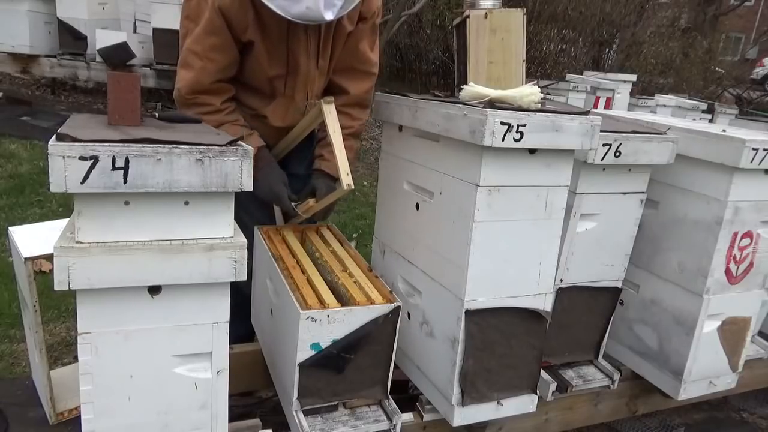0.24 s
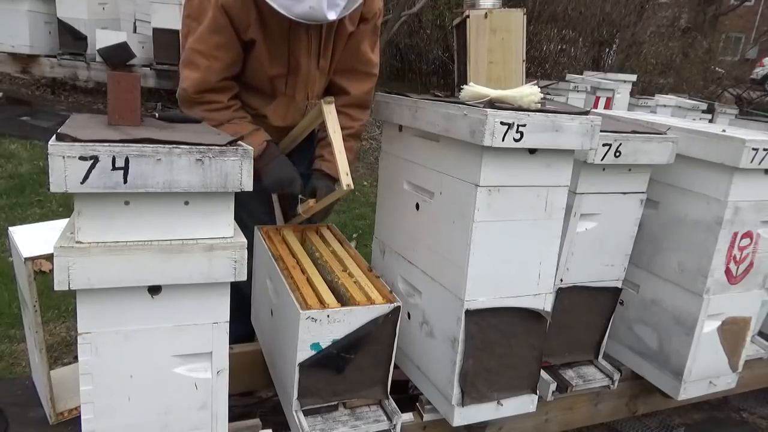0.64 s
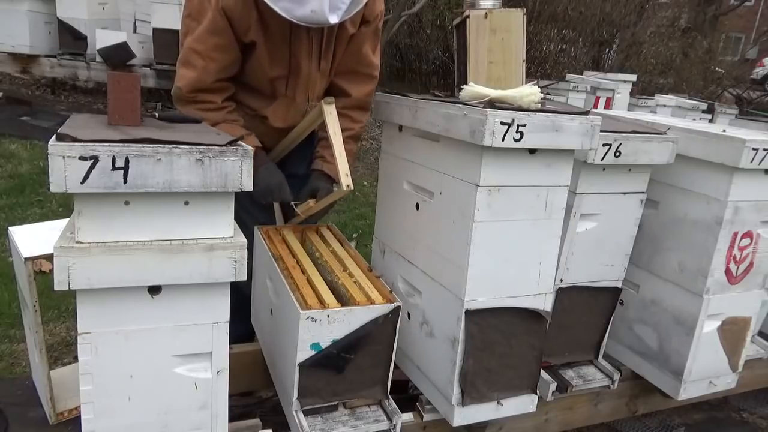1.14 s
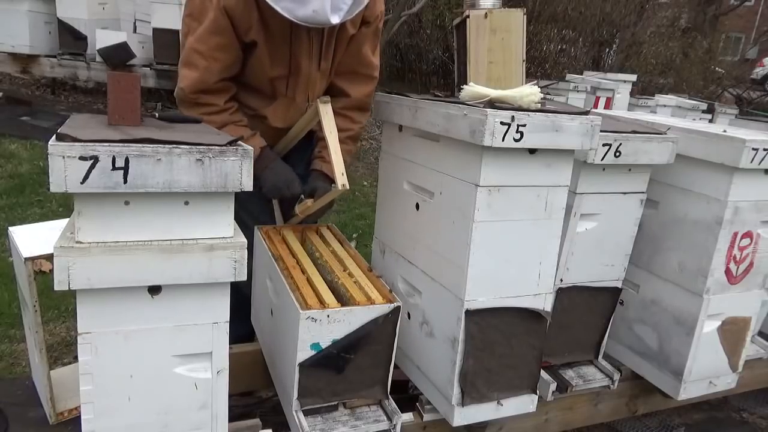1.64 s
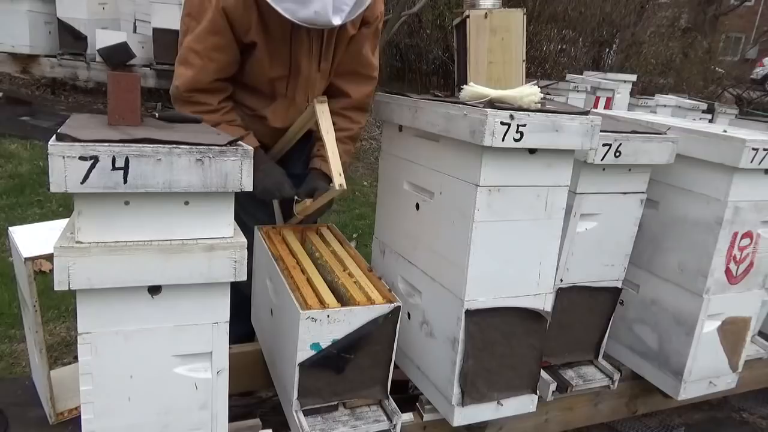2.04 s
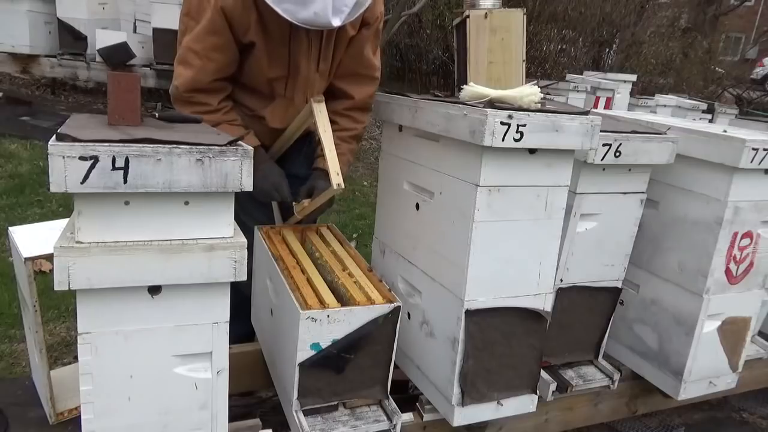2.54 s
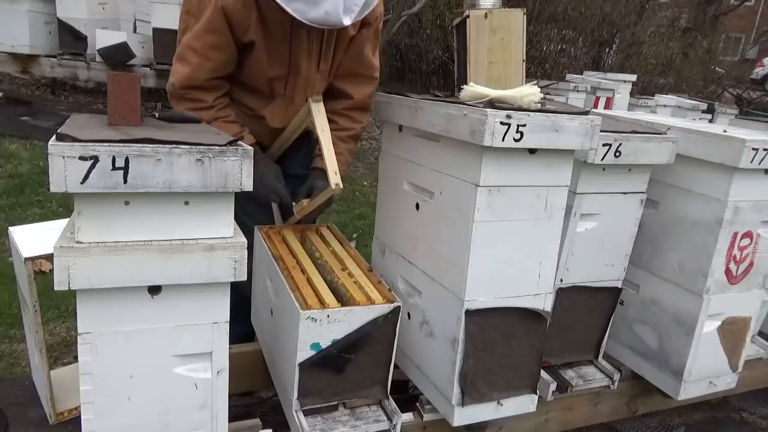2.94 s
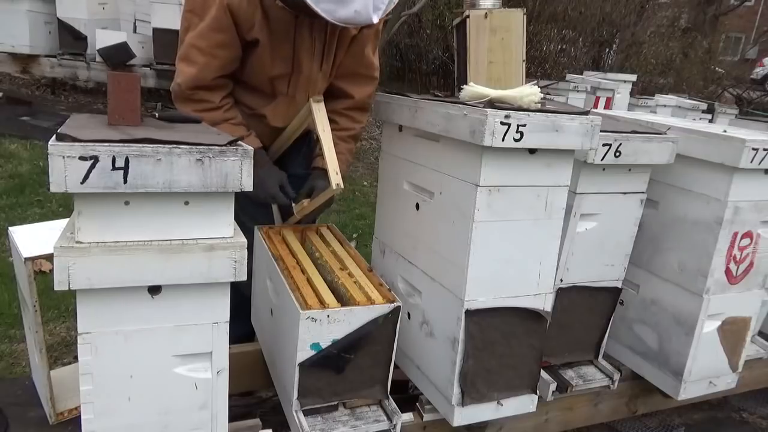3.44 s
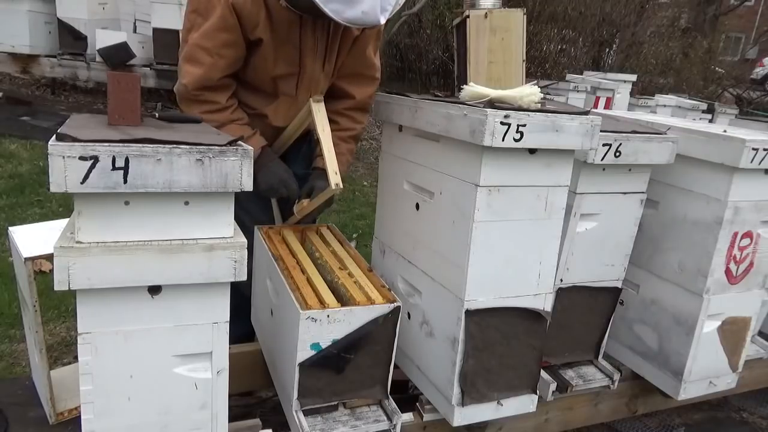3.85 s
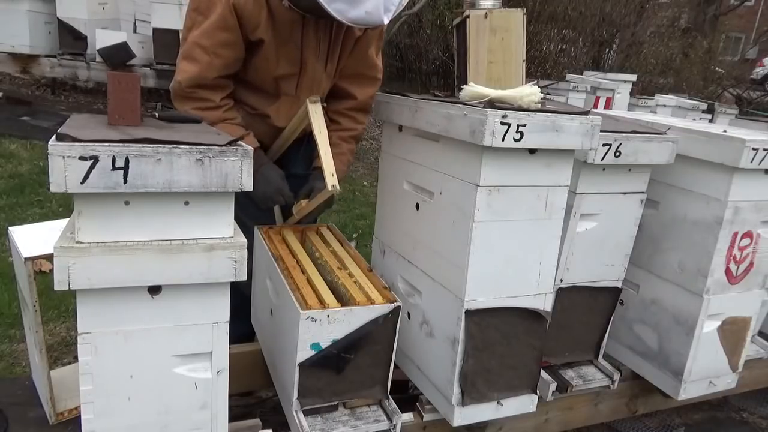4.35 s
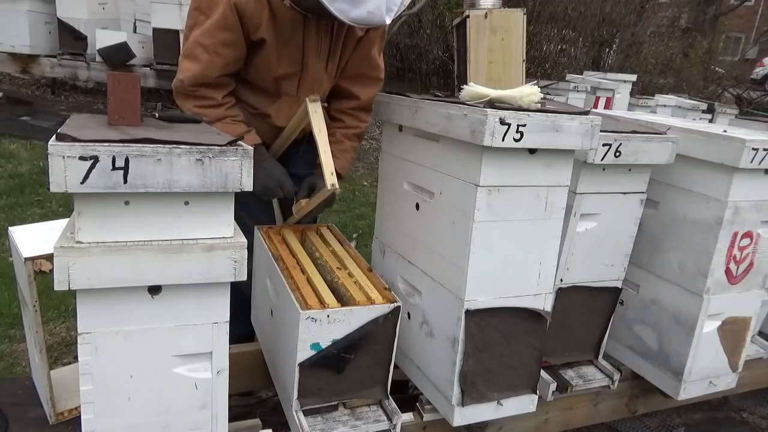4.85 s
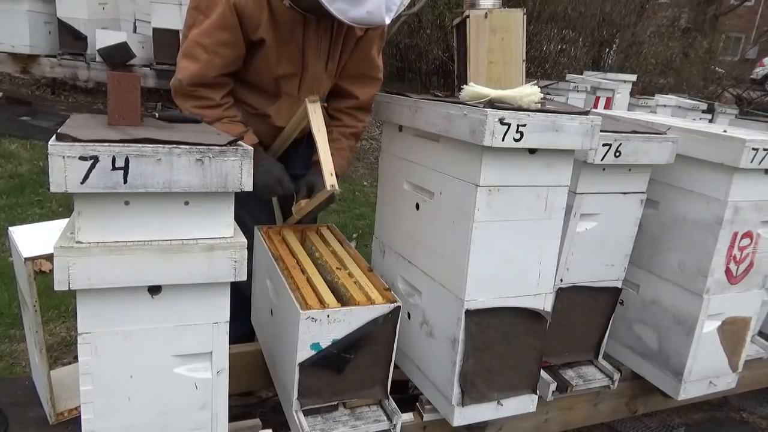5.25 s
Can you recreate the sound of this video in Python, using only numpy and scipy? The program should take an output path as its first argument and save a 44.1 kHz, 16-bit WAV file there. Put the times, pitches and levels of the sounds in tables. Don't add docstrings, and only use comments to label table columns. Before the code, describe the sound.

In an open bee yard with dull distant traffic, gloves and jacket rustle while a zip tie gives stray ticks, a slow creak and a quick rasp. After a sparse pause, hard plastic cracks burst out, then a looser woody ratchet and three final isolated snaps. The camera microphone is a few metres away, its focus motor faintly ticking.

```python
import sys
import numpy as np
from scipy import signal
from scipy.io import wavfile
from scipy.ndimage import uniform_filter1d

SR = 44100
rng = np.random.default_rng(int(sys.argv[2]) if len(sys.argv) > 2 else 0)


def voltage_ratio(level):
    return 10 ** (np.asarray(level, float) / 20)


def generate_wav(sig):
    pcm = np.round(np.clip(np.atleast_2d(sig).T, -1, 1) * 32767).astype(np.int16)
    wavfile.write(sys.argv[1], SR, pcm)


N = 242991
LEAD = 0.003


def evened(x):
    return x / np.sqrt(np.mean(x ** 2) + 1e-20)


def peaked(x):
    return x / np.sqrt(uniform_filter1d(x ** 2, size=88).max() + 1e-20)


def read(points, hz):
    f, value = np.transpose(points)
    return np.interp(np.log(hz + 1), np.log(f + 1), value)


def curve(rows, t):
    return np.interp(t, *np.transpose(rows))


def hold(s, rows):
    return [row for row in rows if row[0] <= s][-1]


def add(mix, s, sound):
    part = mix[..., round(s * SR):][..., :sound.shape[-1]]
    part += sound[..., :part.shape[-1]]


def band(x, lo_hz, hi_hz):
    return signal.sosfilt(signal.butter(N=2, Wn=(lo_hz, hi_hz), btype="band", fs=SR, output="sos"), x)


def notch(x, hz, width_hz):
    return signal.lfilter(*signal.iirnotch(hz, hz / width_hz, fs=SR), x)


def ring(x, hz, width_hz):
    r = np.exp(-np.pi * width_hz / SR)
    poles = [1, -2 * r * np.cos(2 * np.pi * hz / SR), r * r]
    return signal.lfilter([1, 0, -1], poles, x) * np.sqrt(1 - r)


def mode(x, hz, width_hz):
    return ring(ring(x, hz, width_hz), hz, 5 * width_hz) * np.sqrt(width_hz / 200)


def hiss(spectrum, level_db, patchy_db, flicker_db, size):
    # frequency in Hz, left-right likeness from 0 to 1.
    likeness = [(25, 0.88), (60, 0.98), (140, 0.99), (350, 0.93), (840, 0.79), (2030, 0.56), (4890, 0.8),
                (11800, 0.9)]
    frames, hz = 4 * N // size + 5, np.fft.rfftfreq(size, 1 / SR)
    a, b, c, d, patches = rng.standard_normal((5, len(hz), frames))
    patches = uniform_filter1d(patches, size=8, axis=0, mode="wrap")
    patches = evened(uniform_filter1d(patches, size=8, axis=1, mode="wrap"))
    flicker = evened(uniform_filter1d(rng.standard_normal(frames), size=3))
    same = np.clip(read(likeness, hz), -1, 1)[:, None]
    left = a + 1j * b
    right = same * left + np.sqrt(1 - same ** 2) * (c + 1j * d)
    gain = voltage_ratio(read(spectrum, hz)[:, None] + patchy_db * patches + flicker_db * flicker)
    z = np.array([left, right]) * gain
    x = signal.istft(z, nperseg=size, noverlap=3 * size // 4)[1][:, :N]
    return evened(x) * voltage_ratio(curve(level_db, np.arange(N) / SR))


def yard():
    # time in seconds, level in dB.
    traffic = [
        (0, -61.5),
        (.3, -62.5),
        (1.55, -60),
        (2.27, -60.5),
        (3.85, -59),
        (4.05, -57.5),
        (4.5, -57.5),
        (5.51, -56.5),
    ]
    # frequency in Hz, level in dB per Hz.
    colour = [(12, -19), (20, -39), (50, -19), (77, -10), (100, -11.5), (164, -4), (313, -2.5), (432, -3.5),
              (640, -3), (844, -1), (1370, -3.5), (1580, -4.5), (2680, -12.5), (5000, -17), (6500, -24),
              (11000, -120)]
    return hiss(colour, traffic, patchy_db=2.0, flicker_db=1.7, size=2048)


def rustle():
    # middle in seconds, length in seconds, level in dB.
    gestures = [(.0, 0.08, -61.5), (0.093, .05, -56.5), (0.25, 0.081, -60), (.475, 0.094, -54),
                (0.574, 0.033, -54), (0.874, 0.2, -58), (1.04, 0.052, -54), (1.125, 0.081, -56.5),
                (1.43, 0.09, -53.5), (1.621, 0.067, -53), (1.727, 0.31, -59), (2.385, 0.15, -60),
                (3.077, 0.23, -61), (3.523, 0.17, -63), (3.715, 0.028, -56.5), (3.98, 0.27, -62.5),
                (4.24, 0.16, -66), (4.762, 0.13, -63), (4.942, 0.066, -59), (5.31, 0.11, -57)]
    rest_db = -61.5
    t = np.arange(0, N / SR, 0.005)
    power = sum(voltage_ratio(2 * db) * np.exp(-(2 * (t - s) / length) ** 2) for s, length, db in gestures)
    return np.transpose([t, 10 * np.log10(power + voltage_ratio(2 * rest_db))])


def cloth():
    # frequency in Hz, level in dB per Hz.
    colour = [(300, -52), (1000, -0.5), (2200, -13.5), (3500, -9), (5000, -5.5), (6300, -7), (7050, -4.5),
              (7700, -4.5), (8500, -2.5), (10000, -8), (11500, -17)]
    return hiss(colour, rustle(), patchy_db=-1.5, flicker_db=1.0, size=256)


def lens():
    # time in seconds, tick level in dB.
    levels = [
        (0, -62),
        (.95, -66),
        (1.2, -80),
        (3.7, -82),
        (4.3, -64),
        (5.51, -62),
    ]
    out, t = np.zeros(N), np.arange(420) / SR
    steps = np.arange(0.021, N / SR, 1 / 29.97)
    for s, (luck, share, bend) in zip(steps, rng.standard_normal((len(steps), 3))):
        turn = 2 * np.pi * (t + 3 * t ** 2) * (1 + 0.012 * bend)
        high = voltage_ratio(1.5 * share) * np.sin(3640 * turn)
        low = voltage_ratio(-5 - 3 * share) * np.sin(3220 * turn)
        add(out, s, voltage_ratio(curve(levels, s) + 2 + 1.5 * luck) * (high + low) * np.hanning(len(t)))
    return out


def tooth(luck, s, strap_db, frame_db, extra_db=0, *, slip, crack_db, strap_grip_db, focus_db,
          head_hz=4400, strap_width_hz=570, bar_db=-30, top_hz=19000, creep_db=-21, note_width_hz=130,
          dip_hz=14000):
    # time in seconds, level in dB against the tooth.
    stutters = [(1.3728, 3), (2.7907, 0), (2.7915, 3), (2.7928, 2), (2.7937, 3), (2.7945, 0), (2.7952, 1),
                (2.7965, 0), (2.7978, -3), (2.7992, -7), (2.8108, 0), (2.8531, -1), (2.9838, 0),
                (3.0918, -1), (3.1225, -3), (3.1243, -8), (3.1392, -6), (3.1412, -8), (3.1726, -8),
                (3.2869, 4), (4.4188, 9), (4.4193, 8), (4.4206, -2), (4.4225, -7), (4.4245, -10),
                (4.4262, -12), (4.5426, 3), (4.5431, 4), (4.5436, -4), (4.5446, -9), (4.546, -9),
                (4.5476, -15), (4.5488, -14), (4.5506, -18), (5.2784, 10), (5.2789, 4), (5.2805, -2),
                (5.2816, -8), (5.2826, -8), (5.2843, -14)]
    # frequency in Hz, width in Hz, level in dB.
    strap_modes = [(6240, 57, -4), (7320, 670, 8), (7900, 750, -3), (8230, 1800, 4), (9020, 1040, 9),
                   (10100, 6500, 9.5), (11500, 290, -10)]
    head_modes = [(3670, 5200, 7), (4210, 280, 8), (4640, 410, 10), (5080, 1300, 8.5)]
    frame_modes = [(530, 176, -2.5), (793, 143, -3.5), (1250, 230, -1), (1708, 156, 2), (1990, 110, -2),
                   (2205, 270, 5), (2564, 158, 4.5), (2795, 120, 1), (3090, 260, -1)]
    # start in seconds, strap pitch in Hz, frame pitch in Hz,
    # level of the frame's note in dB, head against strap in dB.
    holds = [(0, 7900, 2240, -9, -1), (.7, 8260, 1105, 6, -8.5), (1.0, 8300, 1086, 0, -11),
             (1.3, 8300, 2250, -6, -3.5), (1.8, 7900, 1150, -7, -5), (2.7, 8900, 1244, -0.5, -10),
             (2.803, 9400, 1990, 1, -8.5), (2.93, 8600, 2240, -6, -13.5), (3.05, 8800, 2220, 2, -11),
             (3.25, 8400, 2470, 3.5, -13.5), (3.4, 7900, 2250, 12, -7.5), (3.75, 6160, 2140, 11, -9),
             (3.855, 7100, 2196, 7.5, -2.5), (4.2, 8560, 2630, 0, -5.5), (4.5, 8800, 2320, -2, -8),
             (5.1, 8300, 2420, -14, -12)]
    # start in seconds, lower note in Hz, its level in dB,
    # upper note in Hz, its level in dB, dead spot in Hz.
    free_end = [(0, 5000, -24, 8600, -24, 6440), (1.3, 5000, -13, 6660, -10, 6160),
                (1.8, 5000, -22, 8500, -24, 6250), (2.7, 4400, -24.5, 10450, -13, 7160),
                (2.803, 4320, -27, 9000, -18, 6700), (2.93, 6770, -11, 7900, -10, 5230),
                (3.05, 7120, -9, 7900, -3, 5400), (3.11, 5950, -14.5, 7000, -6, 5700),
                (3.16, 6700, -10, 7740, -7.5, 6200), (3.25, 7130, -4.5, 8640, -21, 6400),
                (3.4, 5000, -18, 8700, -3, 6200), (3.75, 5850, 1, 9250, -11, 7300),
                (3.855, 4700, -14, 8170, -7, 5270), (4.03, 6400, -2, 7100, -2, 5470),
                (4.2, 4540, -13, 8800, -14, 5740), (4.5, 5780, -6.5, 6380, -11, 5030),
                (5.1, 6000, -10.5, 9100, -20, 5670)]
    # start in seconds, second frame note in Hz, its level in dB,
    # gap in Hz where neither wood nor plastic rings.
    grips = [(0, 3000, -20, 3750), (.7, 900, -6.5, 3900), (1.0, 3000, -20, 3800), (1.3, 2570, -6, 3680),
             (1.8, 3000, -20, 3750), (2.7, 3580, -21, 4020), (2.803, 3100, -5.5, 3870),
             (2.93, 2200, -10, 3820), (3.05, 2220, -9.5, 3680), (3.25, 3000, -9, 3700),
             (3.75, 2700, -6.5, 3620), (4.2, 1830, -5, 4290), (4.5, 3360, -3.5, 3940),
             (5.1, 3360, -3, 3950)]
    _, strap_hz, frame_hz, note_db, head_db = hold(s, holds)
    _, low_hz, low_db, high_hz, high_db, dead_hz = hold(s, free_end)
    _, second_hz, second_db, gap_hz = hold(s, grips)

    chance, grain = iter(luck[:20]), luck[20:]
    t = np.arange(len(grain)) / SR - LEAD
    lets_go = np.zeros(len(t))
    for again, db in [(s, 0)] + [row for row in stutters if 0 < row[0] - s < 0.0095]:
        lets_go[round((again - s + LEAD) * SR)] = voltage_ratio(db)
    creep = voltage_ratio(creep_db) * np.exp(np.minimum(t, 0) / 0.0015) * (t < 0)
    chatter = signal.lfilter([1], [1, -voltage_ratio(-60 / slip / SR)], lets_go) + creep
    slips = voltage_ratio(crack_db) * lets_go + grain * chatter
    thud = slips + voltage_ratio(10.0) * signal.lfilter(np.hanning(9) / 4, [1], lets_go)

    def body(push, modes, grip_hz, db_per_octave):
        total = 0
        for hz, width_hz, db in modes:
            away_db = db_per_octave * abs(np.log2(hz / grip_hz))
            total = total + voltage_ratio(db + 1.03 * next(chance) - away_db) * mode(push, hz, width_hz)
        return total

    strap = body(slips, strap_modes, strap_hz, 24.0)
    strap = strap + voltage_ratio(strap_grip_db) * mode(slips, strap_hz, strap_width_hz)
    strap = band(strap, 6630, top_hz)
    frame = body(thud, frame_modes, frame_hz, focus_db)
    frame = frame + voltage_ratio(note_db) * mode(thud, frame_hz, note_width_hz)
    frame = frame + voltage_ratio(bar_db) * mode(thud, 1210, 130)
    frame = band(frame, 410, 2570)
    head = band(body(slips, head_modes, head_hz, 7.9), 1360, 7400)
    free = voltage_ratio(low_db) * peaked(mode(slips, low_hz, 410)) + voltage_ratio(high_db) * peaked(mode(slips, high_hz, 410))
    plastic = peaked(notch(strap, dip_hz, 410)) + voltage_ratio(head_db + extra_db) * peaked(head)
    plastic = notch(plastic, dead_hz, 400) + free
    wood = peaked(frame) + voltage_ratio(second_db) * peaked(mode(thud, second_hz, 320))
    return notch(voltage_ratio(strap_db) * plastic + voltage_ratio(frame_db) * wood, gap_hz, 380)


def rasp():
    k = np.arange(9)
    u = np.linspace(0, 1, 9)
    strap_db = -43.5 - 4 * u ** 2 - 3 * (k % 2)
    frame_db = -48.5 + 9 * np.sin(np.pi * u ** 1.3)
    return np.transpose([1.3705 + 0.00915 * k, strap_db, frame_db])


def tie():
    # time in seconds, strap peak in dB, frame in dB and, in some,
    # head louder than usual in dB. First stray single slips while the hands shift.
    strays = [(0.056, -63, -56, 8), (0.0735, -50, -62, -2), (0.0807, -61, -60, 9), (.1844, -57, -73, -1),
              (.343, -57.5, -73, -12), (.434, -55, -57, -1), (0.579, -49, -58, -9), (0.7665, -55, -70, 9),
              (0.8755, -61, -55, 18), (1.17, -53, -50.5, 3), (1.189, -51.5, -52, 0),
              (1.3422, -56, -77, -10), (1.4864, -47.5, -52, -2), (1.963, -50.5, -50, 0),
              (2.287, -56, -63, -8), (2.3082, -63, -61, 11), (2.609, -58, -54, 2),
              (3.5574, -47.5, -56.5, 3), (4.0876, -56, -62, 1), (4.151, -76, -72, 21.5),
              (4.2612, -70, -58, 18), (4.913, -55, -76, -5), (5.3023, -43, -52, -1),
              (5.481, -65, -56.5, 19)]
    creak = [
        (.7797, -51, -57),
        (.7967, -60, -51),
        (.8161, -54, -50),
        (.8345, -46.5, -46),
        (.8533, -45.5, -45),
        (.8683, -50, -46),
        (.8809, -49, -45),
        (.9003, -46.5, -50),
    ]
    ratchet = [(3.8385, -61, -55), (3.8444, -44.5, -55), (3.8672, -50, -42.5), (3.8978, -45, -42),
               (3.9203, -62, -41.5), (3.9461, -53.5, -46), (3.9658, -60, -41.5), (3.9828, -43, -38.5),
               (3.9904, -52, -37.5), (4.0046, -47.5, -42), (4.0105, -53, -38.5), (4.0428, -47.5, -69),
               (4.0570, -49, -49.5), (4.0639, -49, -38.5)]
    ticks = [
        (2.4893, -52.5, -74, 12.5),
        (4.2807, -48, -52, 1.9),
    ]
    hard = [(2.79, -19, -36.5, -0.5), (2.8089, -33, -40.5, -13), (2.811, -33, -51, 3), (2.82, -35, -46, 1),
            (2.83, -34.5, -52, 2), (2.8385, -34.5, -52, 0), (2.8506, -38, -45, 4), (2.982, -34, -43.5, -3),
            (2.9985, -31.5, -47, 0), (3.0099, -32.5, -43, 4), (3.0176, -32, -44.5, 4),
            (3.0904, -21, -35.5, -0.5), (3.121, -19.5, -35.5, -6), (3.1377, -21.5, -33, 0),
            (3.171, -22, -35.5, 2.5), (3.2857, -19.5, -34.5, 0.5)]
    last = [
        (4.4181, -18, -32),
        (4.5422, -25, -32.5),
        (5.2776, -16, -38.5),
    ]
    loud = [row for row in hard if row[1] > -29]
    lesser = [row for row in hard if row[1] <= -29]
    pulls = [
        (loud, dict(slip=0.017, crack_db=22, strap_grip_db=4, focus_db=4.5)),
        (lesser, dict(slip=0.019, crack_db=13, strap_grip_db=4, focus_db=3)),
        (last, dict(slip=0.015, crack_db=27, strap_grip_db=13, focus_db=6, strap_width_hz=800,
                    top_hz=14000, creep_db=-3, dip_hz=10050)),
        (creak + strays, dict(slip=0.026, crack_db=11, strap_grip_db=14, focus_db=6, note_width_hz=100)),
        (ratchet, dict(slip=0.02, crack_db=12, strap_grip_db=8, focus_db=1.5, head_hz=4750, bar_db=-2,
                       top_hz=9300, note_width_hz=105, creep_db=-12)),
        (rasp(), dict(slip=0.017, crack_db=11, strap_grip_db=7, focus_db=13, head_hz=5100, top_hz=9600)),
        (ticks, dict(slip=0.017, crack_db=9, strap_grip_db=-29, focus_db=-7))]
    out = np.zeros(N)
    for rows, pull in pulls:
        for row, luck in zip(rows, rng.standard_normal((len(rows), 2420))):
            add(out, row[0] - LEAD, tooth(luck, *row, **pull))
    return out


def hives(x):
    # frequency in Hz, time to fall 60 dB in seconds.
    walls = [(500, 0.09), (2000, 0.17), (5000, 0.11), (9000, 0.12)]
    taps = np.zeros((2, SR // 3))
    at = np.arange(200, SR // 3 - 20, 20) + rng.integers(0, 20, (SR // 3 - 201) // 20)
    taps[:, at] = rng.choice([-1., 1.], len(at)) + 1.0 * rng.standard_normal((2, len(at)))
    hz, t, z = signal.stft(taps, SR, nperseg=256)
    decay = voltage_ratio(-60 * t / np.maximum(read(walls, hz), 0.02)[:, None])
    build = 1 - np.exp(-t / 0.018)
    tail = signal.istft(z * build * decay, SR, nperseg=256)[1]
    return signal.fftconvolve(x[None], tail / np.linalg.norm(tail[0]), axes=1)[:, :N]


def bees():
    # middle in seconds, wing beat in Hz, level in dB, half length in seconds.
    passes = [
        (.42, 320, -71, .2),
        (1.63, 190, -65, .1),
        (2.5, 350, -65.5, .12),
        (3.55, 325, -67, .25),
        (4.15, 195, -66.5, .15),
        (5.3, 205, -68.5, .1),
    ]
    out = np.zeros(N)
    for s, hz, db, length in passes:
        t = np.arange(-length, length, 1 / SR)
        waver = evened(uniform_filter1d(rng.standard_normal(len(t)), size=1500))
        turn = 2 * np.pi * np.cumsum(hz * (1 + 0.016 * waver)) / SR
        tone = np.sin(turn) + 0.52 * np.sin(2 * turn) + 0.45 * np.sin(3 * turn)
        add(out, s - length, voltage_ratio(db) * np.hanning(len(t)) * tone)
    return out


def bird():
    # start in seconds, first pitch in Hz, last pitch in Hz, length in seconds, level in dB.
    chirps = [(.489, 3280, 3260, .014, -60), (.689, 3300, 3280, .014, -60), (.843, 3280, 3280, .016, -60),
              (.8735, 3400, 3200, .007, -46), (4.259, 3450, 3200, .008, -53), (4.282, 3600, 3900, .01, -57),
              (4.293, 3320, 3300, .016, -58), (4.325, 3330, 3280, .016, -57),
              (4.493, 3330, 3300, .014, -59), (4.908, 2900, 3100, .014, -60), (5.183, 3100, 2780, .04, -62)]
    out = np.zeros(N)
    for s, from_hz, to_hz, length, db in chirps:
        hz = np.linspace(from_hz, to_hz, round(length * SR))
        add(out, s, voltage_ratio(db + 1.0) * np.sin(2 * np.pi * np.cumsum(hz) / SR) * np.hanning(len(hz)))
    return out


def dragged(rows, modes):
    t = np.arange(rows[0][0], rows[-1][0], 1 / SR)
    drag = rng.standard_normal(len(t))
    rubbed = sum(voltage_ratio(db) * mode(drag, hz, width_hz) for hz, width_hz, db in modes)
    return t[0], voltage_ratio(curve(rows, t)) * evened(rubbed)


def frame_and_tail():
    # time in seconds, level in dB, loudest near this frequency in Hz.
    knocks = [
        (.86, -49.5, 650),
        (1.39, -48, 714),
        (3.009, -53, 600),
        (3.121, -48.5, 700),
        (4.421, -38.5, 473),
        (4.543, -42, 690),
        (5.28, -44.5, 820),
    ]
    # frequency in Hz, width in Hz, level in dB.
    knock_modes = [(232, 35, 5.5), (473, 37, 6.5), (670, 51, 9.5), (830, 83, 12.5)]
    # time in seconds, level in dB.
    scrape = [
        (4.04, -65),
        (4.046, -58),
        (4.06, -48.5),
        (4.075, -56),
        (4.092, -52.5),
        (4.105, -77),
    ]
    # frequency in Hz, width in Hz, level in dB.
    tail_modes = [(3000, 82, -3), (3760, 80, 4), (4030, 100, 0), (4700, 89, -9), (5000, 66, -20),
                  (6400, 70, -5), (7300, 95, -7)]
    # time in seconds, level in dB.
    slide = [
        (1.55, -64),
        (1.59, -57),
        (1.62, -50.5),
        (1.65, -55),
        (1.68, -58),
    ]
    # frequency in Hz, width in Hz, level in dB.
    slide_modes = [(1820, 790, 0), (4800, 220, 0), (7230, 140, 4.5), (8300, 250, -1), (8600, 340, 7),
                   (9800, 300, -6)]
    out, t = np.zeros(N), np.arange(3000) / SR
    for (s, db, top_hz), luck in zip(knocks, rng.standard_normal((len(knocks), len(t)))):
        push = (luck + 2) * voltage_ratio(-60 * t / 0.001)
        knock = 0
        for hz, width_hz, mode_db in knock_modes:
            away_db = 8 * abs(np.log2(hz / top_hz))
            knock = knock + voltage_ratio(mode_db - away_db) * ring(push, hz, width_hz)
        add(out, s, voltage_ratio(db) * peaked(band(knock, 140, 950)))
    add(out, *dragged(scrape, tail_modes))
    add(out, *dragged(slide, slide_modes))
    return out


def scene():
    # time in seconds, left louder by dB.
    lean = [
        (0, 0.5),
        (2.7, 1.5),
        (3.3, 1.0),
        (4.2, 0.8),
        (5.51, 1.5),
    ]
    near = tie() + frame_and_tail()
    late = near - 2 * 0.12 * np.gradient(near)
    lean_db = curve(lean, np.arange(N) / SR) / 2
    direct = np.array([near, late]) * voltage_ratio([lean_db, -lean_db])
    echoes = voltage_ratio(-23.5) * hives(near)
    around = voltage_ratio(1.22) * yard() + voltage_ratio(-1.5) * cloth()
    return direct + echoes + around + lens() + bees() + bird()


def low_pass(x):
    return signal.sosfilt(signal.butter(12, 12380, fs=SR, output="sos"), x)


def record(dry):
    # start in seconds, end in seconds, lost above Hz.
    treble_dips = [
        (2.775, 2.7865, 3000),
        (3.077, 3.086, 2600),
        (3.102, 3.117, 9600),
        (3.15, 3.166, 10400),
        (4.399, 4.413, 2300),
        (4.555, 4.562, 5200),
        (5.2585, 5.274, 3900),
    ]
    # start in seconds, end in seconds, from Hz, to Hz.
    holes = [
        (3.102, 3.117, 3500, 4600),
        (3.105, 3.116, 5600, 6800),
        (3.182, 3.191, 5200, 6800),
        (3.182, 3.191, 10000, 10900),
        (3.298, 3.308, 3800, 6000),
    ]
    edge = signal.firwin(201, 11113, window=("kaiser", 4.0), fs=SR)
    x = signal.oaconvolve(dry, edge[None], "same", axes=1)
    x = x - 0.15 * x ** 3
    for start, end, *hz in [row + (20000,) for row in treble_dips] + holes:
        a, b = round(start * SR), round(end * SR)
        lost = signal.butter(N=5, Wn=hz, btype="band", fs=SR, output="sos")
        treble = signal.sosfiltfilt(lost, x[:, a - 300:b])[:, 300:]
        add(x, start, -treble * signal.windows.tukey(b - a, 0.2))
    return low_pass(x + voltage_ratio(-104) * rng.standard_normal(dry.shape))


dry = scene()
out = record(dry)
generate_wav(out)
```